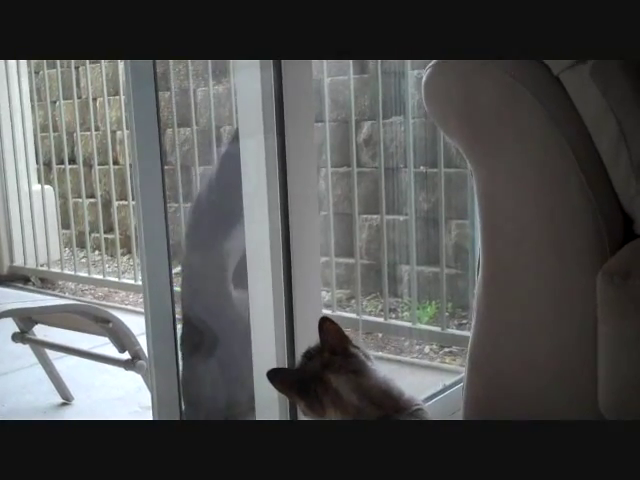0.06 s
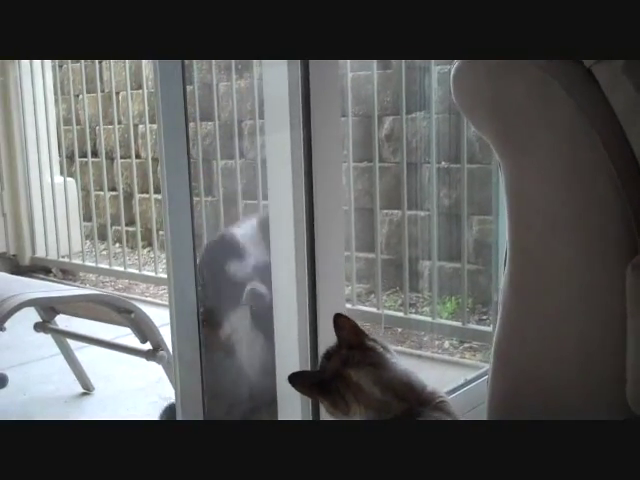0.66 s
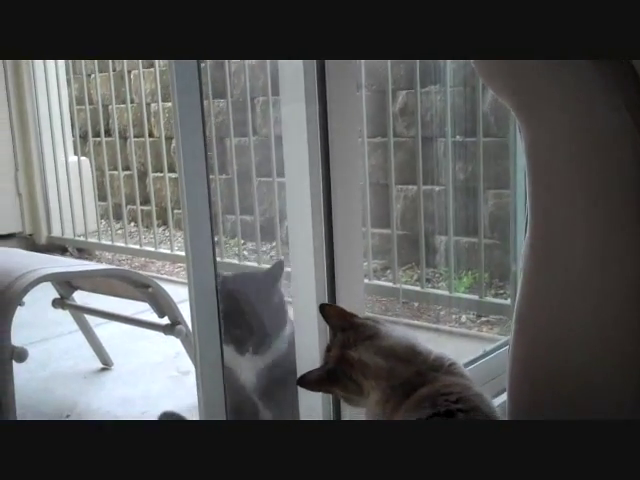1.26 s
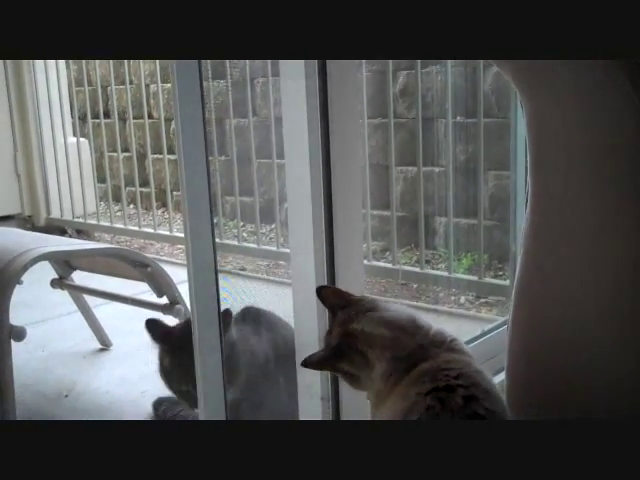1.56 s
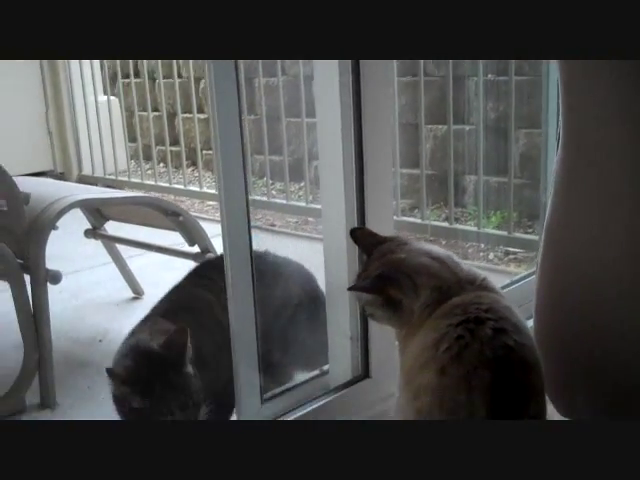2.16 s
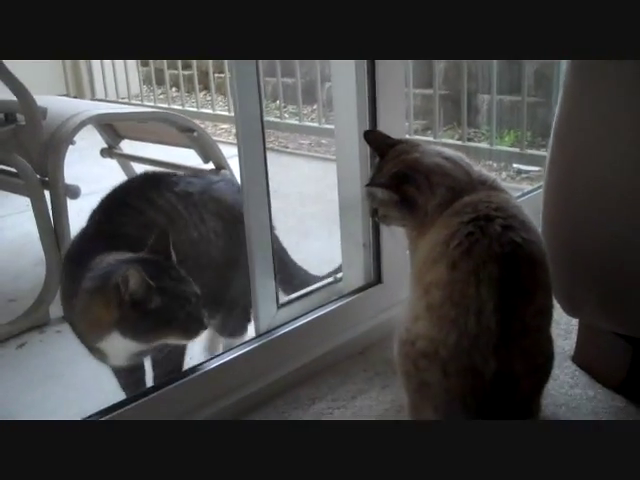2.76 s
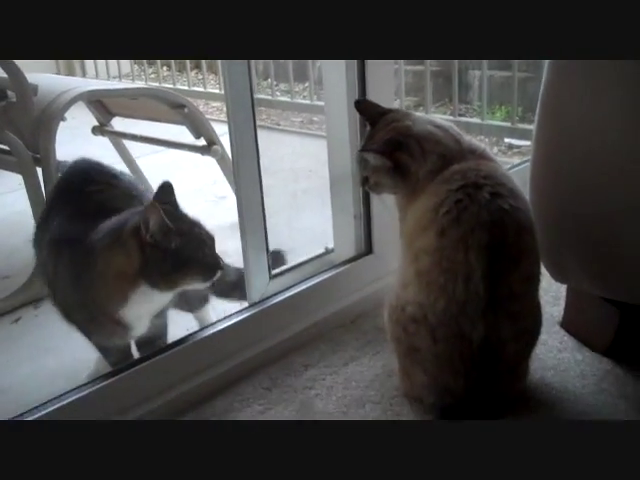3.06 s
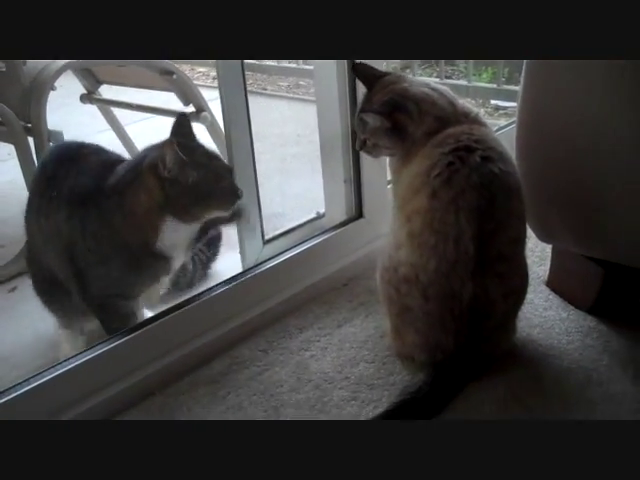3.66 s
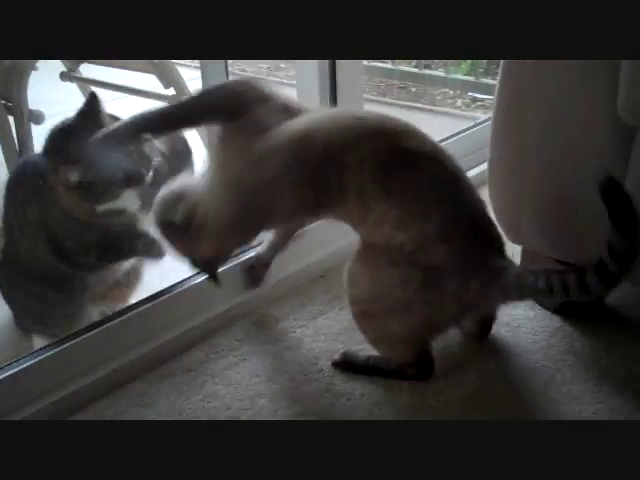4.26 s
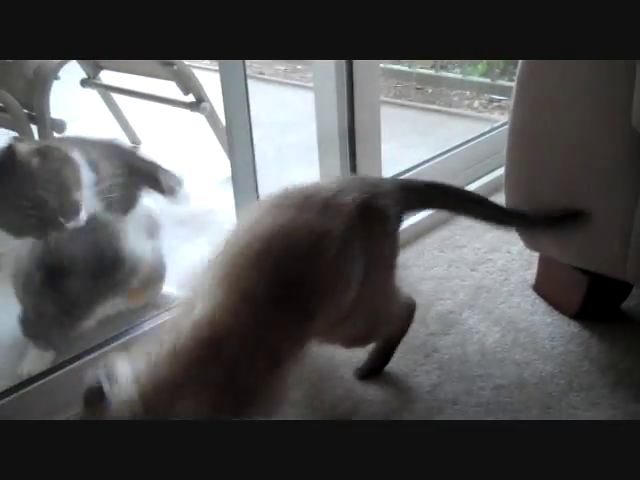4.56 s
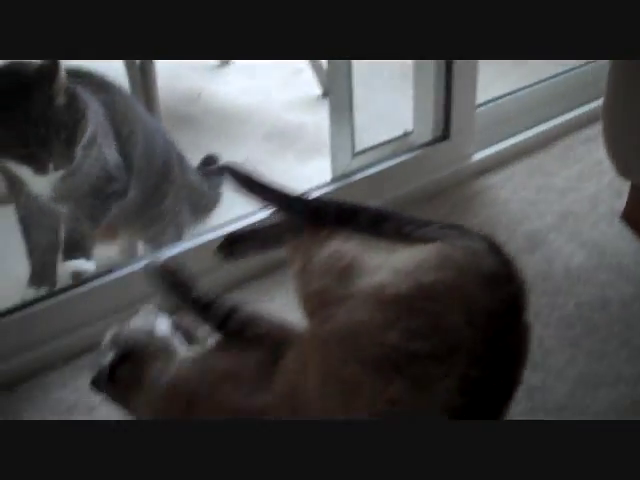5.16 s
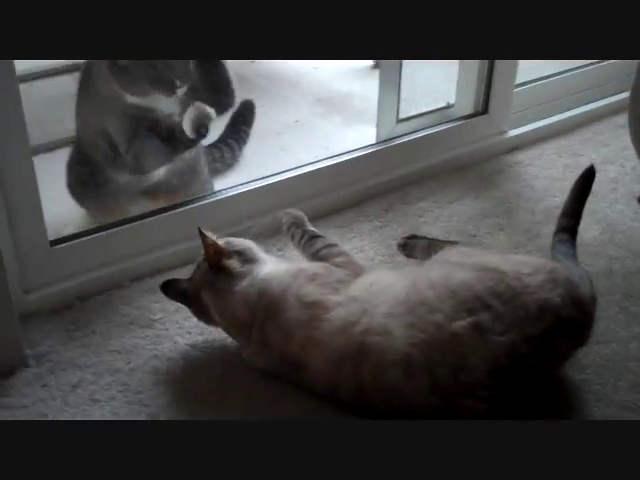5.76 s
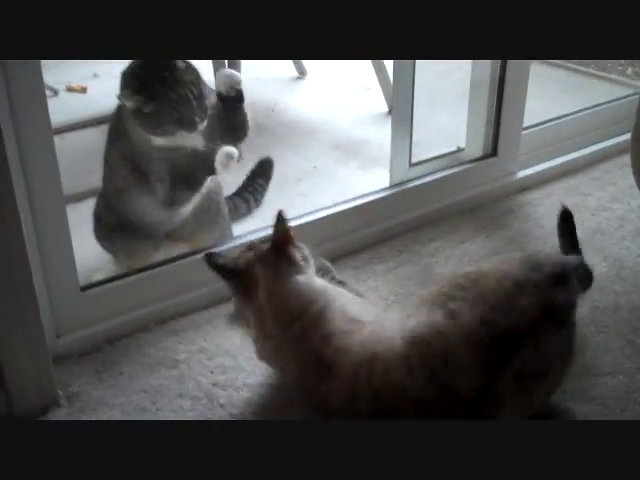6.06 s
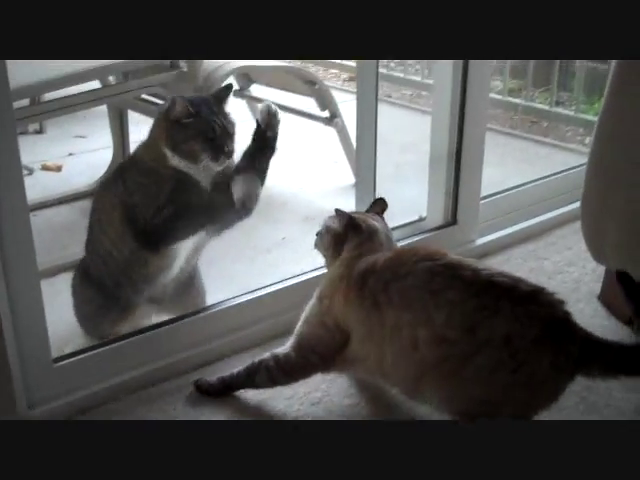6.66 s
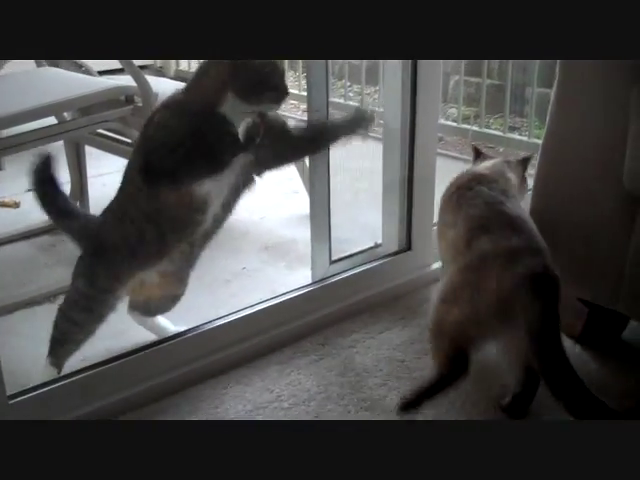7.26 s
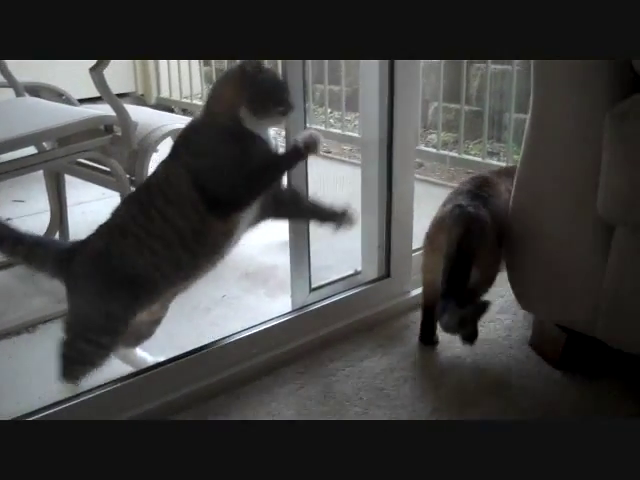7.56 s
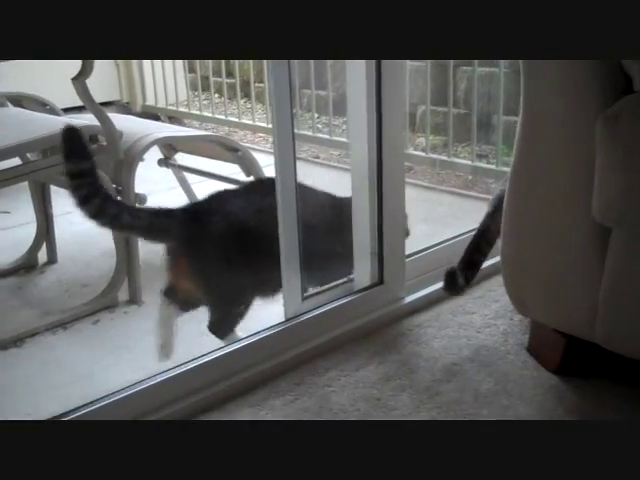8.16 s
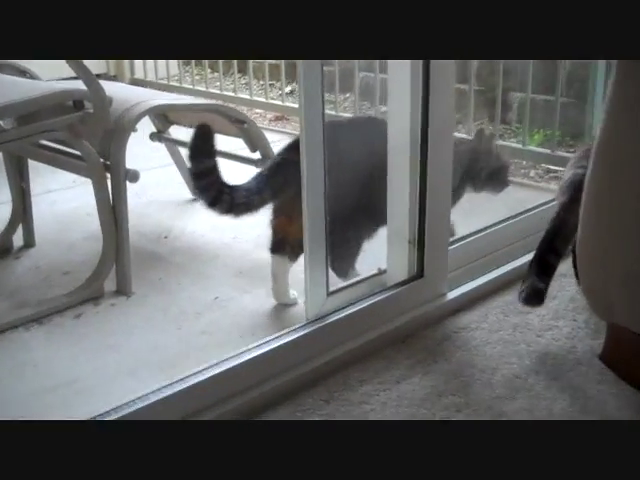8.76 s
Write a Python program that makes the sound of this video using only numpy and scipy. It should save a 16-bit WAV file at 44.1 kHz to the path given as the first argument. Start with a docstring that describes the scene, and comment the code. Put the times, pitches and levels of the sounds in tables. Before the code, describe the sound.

Light paw taps on a sliding glass door give way to loud thumps, rattles and claw scratches over a soft hiss.

```python
"""A carpeted living room, where two cats spar through a sliding glass door.
Paws swat and thump the pane, rattle the metal frame and rake the glass with their claws.
One pad sticks and slips down the glass, fur rubs along the sill, and after a push the door rocks
in its track. Small birds chirp faintly outdoors; a camera hisses and whines."""
import sys
import numpy as np
from scipy import signal
from scipy.fft import rfft, irfft, next_fast_len
from scipy.io import wavfile
from scipy.ndimage import uniform_filter1d

SR = 44100
rng = np.random.default_rng(int(sys.argv[2]) if len(sys.argv) > 2 else 0)


def file_out(sig):
    """Save sig as 16-bit WAV at sys.argv[1]."""
    # one column per channel
    cols = np.atleast_2d(sig).T
    # limit, then scale
    lim = np.clip(cols, -1, 1)
    pcm = np.round(lim * 32767).astype(np.int16)
    wavfile.write(sys.argv[1], SR, pcm)


N = 393372
TIME = np.arange(N) / SR
TAIL = TIME[:int(.44 * SR)]   # time axis of one short, fading sound


def paw_blows(spot_count=7):
    """Sharp swats and dull thumps land on changing spots of the door, which also rocks twice."""
    # paw swats: start_s, strength_db, claws_out_db, contact_s
    swats = [(0.421, -61.5, -6, .007), (0.487, -41, -3, 0.012), (0.548, -40.5, -8.5, 0.014),
             (0.594, -48, 0.5, 0.0046), (0.613, -53.5, -10, 0.027), (0.971, -62, -10.5, 0.01),
             (3.97, -40.5, 2, 0.0092), (3.985, -40.5, -4, 0.0048), (4.0745, -19.5, 3, .001),
             (4.078, -19.5, 0.5, 0.0054), (4.279, -44, -4.5, .011), (4.3, -42, -1, .012),
             (4.376, -44, -1, .0013), (4.406, -28.5, -3, 0.027), (4.442, -29.5, 0, 0.011),
             (4.453, -23.5, 1, 0.0046), (4.464, -36, 10.5, 0.018), (4.56, -34, 3.5, 0.015),
             (4.631, -42.5, -1, 0.0029), (4.683, -43, 6.5, 0.0085), (4.755, -27, 2.5, 0.0095),
             (4.857, -32.5, 9, 0.0046), (4.935, -46, -5.5, 0.021), (5.287, -49, -1, 0.021),
             (5.726, -54, -3, .009), (5.828, -54, 4, .045), (5.882, -41.5, 1.5, 0.0097),
             (6.215, -37, 5, 0.011), (6.679, -48.5, 0.5, 0.0045), (6.737, -44, 6, 0.028),
             (6.806, -47, 4, 0.026), (6.943, -39, 7.5, 0.0034), (6.959, -48, 10, .032),
             (7.015, -56, 23.5, 0.023), (7.092, -38.5, 2, 0.01), (7.248, -33.5, -3, 0.011),
             (7.349, -41.5, 6.5, 0.011), (7.375, -47, -9, 0.042), (7.44, -42.5, -1, .003),
             (7.459, -41.5, 4.5, 0.003), (7.529, -35, 6.5, 0.0078), (7.542, -45, -0.5, 0.01)]
    # a cat's weight bumps the pane: start_s, strength_db, depth_db, contact_s
    thumps = [(0.63, -47.5, 5, 0.042), (4.097, -36.5, -14, .017), (4.406, -32, 0.5, 0.035),
              (4.464, -40, -3, 0.013), (4.655, -38.5, 1.5, 0.011), (4.706, -41, 0.5, 0.0058),
              (4.762, -38.5, -3, 0.0025), (4.805, -43, 6, 0.01), (4.857, -35, -7.5, 0.0065),
              (4.933, -47, -4.5, 0.0052), (5.882, -65, 10.5, 0.016), (6.844, -62.5, 9, 0.021),
              (6.944, -66, 13, .005), (7.087, -57, 7.5, 0.011), (7.28, -49.5, 7.5, 0.014),
              (7.35, -48, 7, .035)]
    # how strongly each door part answers (rows: thud, pane, frame, scrape, claw):
    # swat_db, db_per_claws_out_db, thump_db, db_per_depth_db, knock_db
    responses = [(-23.5, -0.2, -9, 1.2, -9), (-17.5, -0.7, -1.5, -0.53, -1), (-4, -0.8, -7.5, 0.33, -2),
                 (0.5, -0.08, -45, -1, -16), (0, 1.09, -22, -0.76, -15)]
    swat_db, by_claws, thump_db, by_depth, knock_db = np.transpose(responses)
    spots = [door_spot() for _ in range(spot_count)]
    rail = rail_ring()
    hits = [(s, db + swat_db + claws * by_claws, length_s) for s, db, claws, length_s in swats]
    hits += [(s, db + thump_db + depth * by_depth, length_s) for s, db, depth, length_s in thumps]
    out = door_rocking(spots[0], rail, knock_db)
    for k, (start_s, levels_db, length_s) in enumerate(hits):
        add(out, start_s, strike(spots[k % spot_count], rail, start_s, levels_db, length_s))
    return out


def strike(spot, rail, start_s, levels_db, length_s, tip_db=-17, rail_db=-15, jolt_limit_db=-32):
    """One contact shakes every part of the door; hard claw tips add a thin, high edge."""
    # how well blows reach pane and rail as the cats move along the door: time_s, pane_db, rail_db
    reach = [(0.5, 1, 0), (4.5, -0.5, 4.5), (6.2, 4.5, 4), (7.25, -4.5, 9), (7.8, -5.5, 7)]
    times, to_pane_db, to_rail_db = np.transpose(reach)
    thud_db, pane_db, frame_db, scrape_db, claw_db = levels_db
    pane_db = pane_db + np.interp(start_s, times, to_pane_db)
    force = cushioned(paw_force(length_s), claw_db - frame_db, cutoff_hz=3500)
    push = cushioned(force, pane_db - thud_db, cutoff_hz=200)   # more weight, deeper thud
    # a jolt of the frame sets the rail ringing, but only up to a limit
    jolt_db = min(max(frame_db, scrape_db), jolt_limit_db) + np.interp(start_s, times, to_rail_db)
    sound = from_db(claw_db + tip_db) * claw_tip(force)
    sound += from_db(thud_db) * excite(push, spot[0])
    for ring, db in zip([*spot[1:], rail], (pane_db, frame_db, scrape_db, claw_db, jolt_db + rail_db)):
        sound += from_db(db) * excite(force, ring)
    return sound


def paw_force(length_s, snags_per_s=1000, spread_db=5, slap_s=0.0096):
    """A short slap lands hard, a long swipe softly; toes and claws snag at random as they slide."""
    t = TAIL[:len(TAIL) // 8]
    snags = rng.random(len(t)) < snags_per_s / SR
    sizes = from_db(spread_db * np.clip(rng.standard_normal(len(t)), -2, 2))
    pressure = np.exp(-(t / length_s) ** 4) * (1 - np.exp(-t / (0.047 * length_s)))
    force = snags * sizes * rng.choice([-1, 1], len(t)) * pressure
    force[0] = slap_s / length_s   # the landing
    return force[None]


def cushioned(force, hardness_db, cutoff_hz, db_per_octave=7):
    """A soft pad rounds the force off; a harder touch keeps more treble."""
    corner_hz = np.clip(cutoff_hz * 2 ** (hardness_db / db_per_octave), 70, .4 * SR)
    return signal.sosfilt(signal.butter(2, corner_hz, fs=SR, output="sos"), force + 1e-18)


def door_spot(swell_s=0.0062):
    """How each door part rings after a tap on one spot; the heavy pane takes a moment to get moving."""
    # door parts (rows: thud, pane, frame, scrape, claw):
    # low_hz, high_hz, crack_db, ring_s, room_db, room_s, left_right_likeness
    parts = [(52.7, 215, -1, 0.12, -4.5, 0.55, 0.98), (223, 442, -2.5, 0.13, -2, 0.33, 1),
             (580, 2230, -5, 0.015, 0, 0.37, 0.96), (1960, 6280, -7.5, 0.12, -6.5, 0.39, 0.53),
             (6200, 8460, -4.5, 0.031, -6.5, 0.35, 0.11)]
    rings = [door_part(*part) for part in parts]
    swell = 1 - np.exp(-TAIL / swell_s)
    return [ring * swell for ring in rings[:2]] + rings[2:]


def door_part(low_hz, high_hz, crack_db, ring_s, room_db, room_s, likeness, tones_db=-3):
    """One tapped part of the door gives a crack, a noisy ring, a room echo and a few clear tones."""
    # natural tones of the glass and its aluminium frame: pitch_hz, level_db, fade_s
    tones = [(69.6, -4, 0.2), (78, -20.5, 0.197), (166, -16, 0.118), (243.4, -11.5, 0.4), (255.2, -2, 0.28),
             (331.6, 2, 0.31), (370, 6, 0.07), (645.3, -11.5, 0.22), (703.7, -10.5, 0.13), (790, -11, 0.24),
             (972, -6.5, 0.27), (1176, -8.5, 0.17), (1770, -4, 0.39), (2710, -26.5, 0.19),
             (3170, -36, 0.067), (3914, -7.5, 0.05), (4560, -21, 0.13), (7160, -2, 0.016)]
    click = signal.unit_impulse(len(TAIL))
    full_range = click, fading_noise(ring_s, likeness), room_echo(room_s, likeness * 0.91)
    crack, ring, echo = (energy_one(band(x, low_hz, high_hz, order=3)) for x in full_range)
    sound = from_db(crack_db) * crack + ring + from_db(room_db) * echo
    for hz, db, fade_s in tones:
        if low_hz < hz < high_hz:
            sound += from_db(db + tones_db) * energy_one(fading_tone(hz, fade_s))
    return sound


def rail_ring(pitch_hz=3950, width_hz=280, fade_s=0.38):
    """The hollow aluminium rail sings on in a cluster of close tones."""
    return band(fading_noise(fade_s, likeness=0.25), pitch_hz - width_hz / 2, pitch_hz + width_hz / 2)


def claw_tip(force, fade_s=0.029):
    """A hard claw on glass makes a thin, dry sizzle."""
    sizzle = signal.fftconvolve(force, fading_noise(fade_s, likeness=.1), axes=1)
    return peak_one(band(sizzle, 10000, 14200))


def door_rocking(spot, rail, knock_db, knocks=5, gap_s=0.118, swell_s=0.0068):
    """Let go after a push, the door knocks in its track ever more softly; each knock hums in the pane."""
    # bouts of rocking: start_s, first_knock_db, loss_per_knock_db, hum_db
    bouts = [(0.849, -55.5, 3, -3), (7.757, -50.5, 4.5, -8.5)]
    out = np.zeros((2, N))
    hum = fading_tone(pitch_hz=323, fade_s=0.5) * (1 - np.exp(-TAIL / swell_s))
    for start_s, first_db, loss_db, hum_db in bouts:
        for k in range(knocks):
            at_s, db = start_s + k * gap_s, first_db - k * loss_db
            add(out, at_s, strike(spot, rail, at_s, db + knock_db, length_s=0.03))
            add(out, at_s, from_db(db + hum_db) * peak_one(hum[None]))
    return out


def pad_judder(slips_per_s=238, jitter=0.1465, ring_s=0.015, room_db=-7):
    """A pad sticks and slips on the glass; each slip rings briefly, higher as the paw presses."""
    # one list of points for each stroke: time_s, level_db, pitch_hz
    strokes = [
        [(4.372, -61, 1400), (4.394, -33.5, 1330), (4.41, -22, 1550), (4.425, -24, 1540), (4.44, -26.5, 1450),
         (4.455, -22, 1760), (4.468, -62, 1770)],
        [(4.558, -31, 1000), (4.575, -30.5, 970), (4.6, -48, 830), (4.62, -77, 740)],
    ]
    out, t = np.zeros((2, N)), TAIL[:len(TAIL) // 15]
    for stroke in strokes:
        times, db, hz = np.transpose(stroke)
        slips = times[0] + np.cumsum(1 + jitter * rng.standard_normal(size=30)) / slips_per_s
        for at_s in slips[slips < times[-1]]:
            ring = energy_one(fading_tone(np.interp(at_s, times, hz), ring_s, t))
            add(out, at_s, from_db(np.interp(at_s, times, db)) * np.sqrt(SR / slips_per_s) * ring)
    echo = energy_one(room_echo(fade_s=0.23, likeness=0.56))
    return out + from_db(room_db) * signal.fftconvolve(out, echo, axes=1)[:, :N]


def claw_skids():
    """Claw tips slide briefly over the glass."""
    # skids: start_s, level_db, length_s
    skids = [(4.446, -28.5, 0.03), (4.563, -36, .018), (7.456, -44, 0.006)]
    out = np.zeros((2, N))
    for start_s, db, length_s in skids:
        add(out, start_s, from_db(db) * claw_tip(paw_force(length_s)))
    return out


def fur_rubbing(gain_db=-2, grain_db=1.5, rise_s=0.021, fall_s=0.049):
    """Fur brushes the sill and claws catch in the carpet; each stroke swells, holds and dies away."""
    # strokes: start_s, length_s, brush_db, scratch_db
    strokes = [(4.01, 0.13, -77, -47), (4.333, 0.066, -58, -43), (4.388, 0.08, -46, -33),
               (4.558, .43, -52, -41.5), (5.27, 0.74, -62.5, -63), (5.914, 0.16, -50.5, -53),
               (6.418, 0.21, -60.5, -53), (6.709, 0.18, -57.5, -47.5), (6.965, 0.19, -58, -43.5),
               (7.25, 0.43, -53.5, -49)]
    # tone colour of soft fur: frequency_hz, level_db
    brush_colour = [(60, -14), (150, -26.5), (240, -2), (340, -8), (480, -1.5), (700, -4.5), (1100, -1.5),
                    (2000, -4.5), (4000, -9.5), (9000, -55)]
    # tone colour of claws in carpet: frequency_hz, level_db
    scratch_colour = [(900, -41), (2200, -1), (3900, 2.5), (5800, 2.5), (7400, 8), (8800, -3), (10500, -7),
                      (14000, -9)]
    grains = from_db(grain_db * rms_one(uniform_filter1d(rng.standard_normal(N), size=140)))
    brush = rms_one(colour(stereo_noise(N, likeness=0.86) * grains, brush_colour))
    scratch = rms_one(colour(stereo_noise(N, likeness=0.078) * grains, scratch_colour))
    out = np.zeros((2, N))
    for start_s, length_s, brush_db, scratch_db in strokes:
        rise = np.clip((TIME - start_s) / rise_s, 0, 1)
        fall = np.exp(-np.clip((TIME - start_s - length_s) / fall_s, 0, 20))
        out += rise * fall * (brush * from_db(brush_db) + scratch * from_db(scratch_db))
    return from_db(gain_db) * out


def birds(fall=0.071, rasp=0.15, lower_ratio=.72, lower_db=-4, direct_db=-12):
    """Harsh, falling two-voiced chirps, smeared by echoes from the patio walls and the room."""
    # chirps: start_s, level_db, pitch_hz, length_s
    chirps = [(0.684, -55.5, 4600, 0.054), (1.544, -56, 5260, .025), (1.564, -58, 4415, 0.03),
              (2.558, -58, 4970, 0.03), (3.533, -52, 4860, 0.02), (3.587, -54, 4750, 0.016),
              (3.8, -53, 4280, 0.035), (5.54, -52, 4790, 0.029), (5.584, -50.5, 4890, 0.018),
              (6.357, -49, 7100, 0.044), (6.43, -53.5, 7100, .055)]
    out, t = np.zeros((2, N)), TAIL[:len(TAIL) // 4]
    for start_s, db, hz, length_s in chirps:
        progress = np.minimum(t / length_s, 1)
        wobble = rms_one(uniform_filter1d(rng.standard_normal((2, len(t))), size=10))
        pitch_hz = hz * np.array([[1], [lower_ratio]]) * (1 + fall * (.5 - progress) + rasp * wobble)
        upper, lower = np.sin(2 * np.pi * np.cumsum(pitch_hz, axis=1) / SR)
        note = (upper + from_db(lower_db) * lower) * np.sqrt(np.abs(np.sin(np.pi * progress)))
        path = energy_one(room_echo(fade_s=0.39, likeness=0.068))
        path[:, 0] += from_db(direct_db)
        add(out, start_s, from_db(db) * excite(note[None], path))
    return out


def camera_noise(hiss_db=-59, tick_s=2.268, tick_db=-52):
    """A camera gives off a steady hiss and thin whining tones; its housing ticks once."""
    # tone colour of the hiss: frequency_hz, level_db
    hiss_colour = [(15, -42), (25, -6.5), (74, -6), (240, -1), (577, -0.5), (659, -1.5), (815, -1.5),
                   (906, -1.5), (2840, -6.5), (6480, -10.5), (7610, -1.5), (8920, -11), (11000, -13.5),
                   (12000, -9.5), (14400, -19)]
    # how much louder the hiss is on the left: frequency_hz, left_minus_right_db
    balance = [(60, 3.5), (200, 6), (700, 4.5), (2300, 2), (4500, 2), (14000, -1)]
    # whining tones: pitch_hz, level_db
    whine = [(3935, -92), (7854, -81), (7881, -90), (11806, -77.5)]
    left, right = colour(rng.standard_normal((2, N)), hiss_colour)
    left = colour(left, np.array(balance) * [1, .5])
    right = colour(right, np.array(balance) * [1, -.5])
    out = from_db(hiss_db) * rms_one(np.array([left, right]))
    for hz, db in whine:
        out += from_db(db) * rms_one(np.sin(2 * np.pi * hz * TIME))
    tick = band(fading_noise(fade_s=0.017, likeness=0.44), 5100, 7800)
    add(out, tick_s, from_db(tick_db) * peak_one(tick))
    return out


def room_echo(fade_s, likeness, build_s=0.0026):
    """Echoes build up as the sound returns from the first walls, then die away."""
    return fading_noise(fade_s, likeness) * (1 - np.exp(-(TAIL / build_s) ** 2))


def microphones(x):
    """Two microphone openings colour the sound; the right one is duller in the high treble."""
    # left opening: frequency_hz, gain_db
    left_colour = [(600, 1), (1500, -1), (7000, -0.5), (8200, 5), (10000, 2.5), (12500, -7)]
    # right opening: frequency_hz, gain_db
    right_colour = [(600, 3.5), (1500, 0), (7000, 0), (8200, -4.5), (10000, -3.5), (12500, -16)]
    return np.array([colour(x[0], left_colour), colour(x[1], right_colour)])


def excite(x, ring):
    """Every sample of x sets off a ring or echo; the sum is scaled to a peak level of 1."""
    return peak_one(signal.fftconvolve(x, ring, axes=1))


def fading_tone(pitch_hz, fade_s, t=TAIL):
    """A pure tone that drops 60 dB in fade_s."""
    return np.sin(2 * np.pi * pitch_hz * t) * from_db(-60 * t / fade_s)


def fading_noise(fade_s, likeness):
    """Countless close tones or echoes blur into noise that drops 60 dB in fade_s."""
    return stereo_noise(len(TAIL), likeness) * from_db(-60 * TAIL / fade_s)


def stereo_noise(count, likeness):
    """Left and right noise: unrelated at likeness 0, the same at 1."""
    mid, side = rng.standard_normal((2, count))
    return np.sqrt(1 + likeness) * mid + np.sqrt(1 - likeness) * np.array([side, -side])


def colour(x, points):
    """Shape the tone of x along a curve of (frequency_hz, gain_db) points."""
    hz, db = np.transpose(points)
    size = next_fast_len(N)
    bins_hz = np.maximum(np.fft.rfftfreq(size, 1 / SR), 1)
    gain = from_db(np.interp(np.log(bins_hz), np.log(hz), db))
    return irfft(rfft(x, size) * gain, size)[..., :N]


def band(x, low_hz, high_hz, order=2):
    """Keep what lies between two frequencies."""
    return signal.sosfilt(signal.butter(order, [low_hz, high_hz], "band", fs=SR, output="sos"), x + 1e-18)


def from_db(db):
    """Turn decibels into a gain."""
    return 10 ** (np.asarray(db) / 20)


def rms_one(x):
    """Scale to an average (rms) level of 1."""
    return x / np.sqrt(np.mean(x ** 2) + 1e-20)


def energy_one(x):
    """Scale to an energy of 1 per channel."""
    return rms_one(x) / np.sqrt(x.shape[-1])


def peak_one(x):
    """Scale so that the loudest hundredth of a second has level 1."""
    return x / np.sqrt(uniform_filter1d(np.mean(x ** 2, axis=0), size=441).max() + 1e-20)


def add(out, start_s, x):
    """Mix x into out from start_s on."""
    i = round(start_s * SR)
    out[:, i:i + x.shape[-1]] += x[..., :N - i]


def scene():
    """Cats at the door, birds beyond it, and camera noise."""
    sounds = paw_blows() + fur_rubbing() + pad_judder() + birds() + claw_skids()
    return microphones(sounds) + camera_noise()


def record(dry, cutoff_hz=14400):
    """The highest treble is cut off steeply."""
    return signal.sosfilt(signal.ellip(10, .2, 80, cutoff_hz, fs=SR, output="sos"), dry)


dry = scene()
out = record(dry)
file_out(out)
```